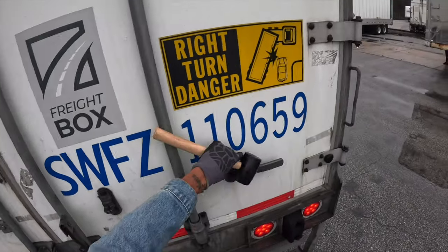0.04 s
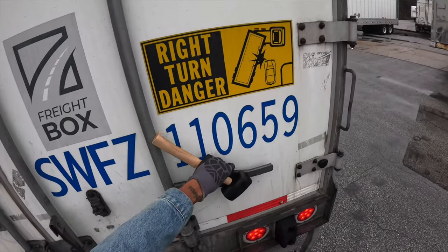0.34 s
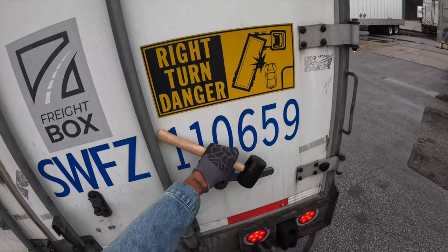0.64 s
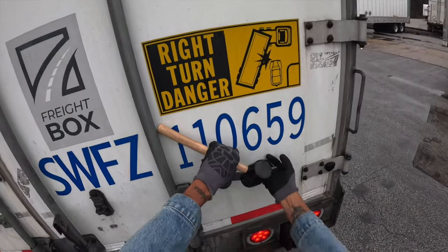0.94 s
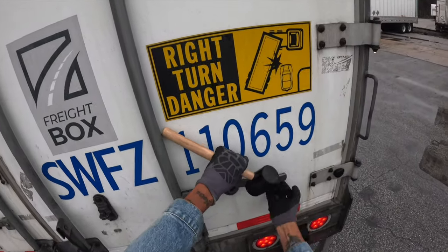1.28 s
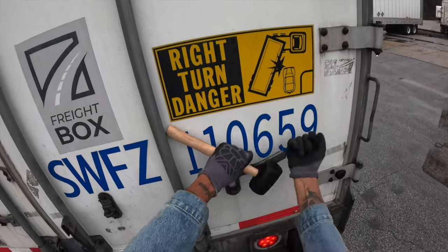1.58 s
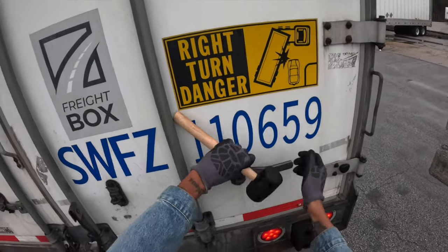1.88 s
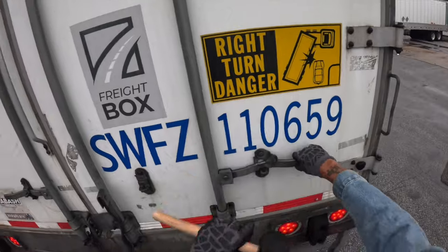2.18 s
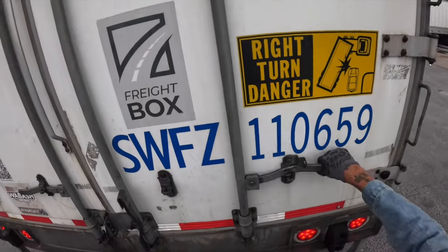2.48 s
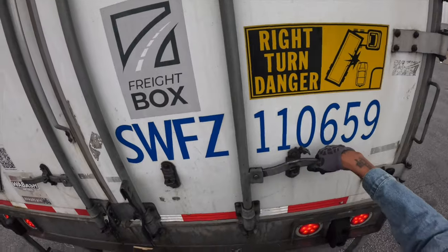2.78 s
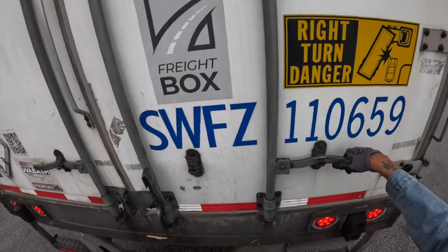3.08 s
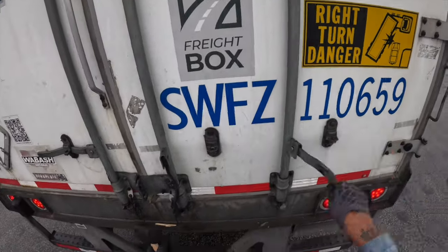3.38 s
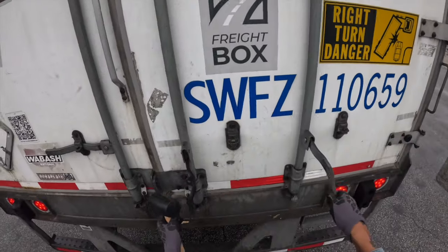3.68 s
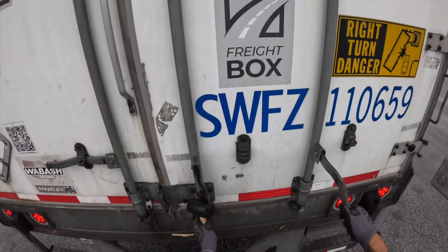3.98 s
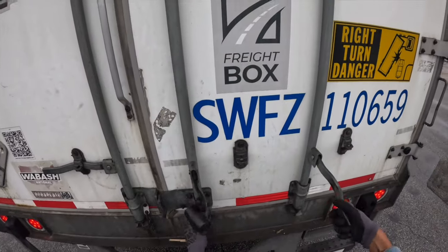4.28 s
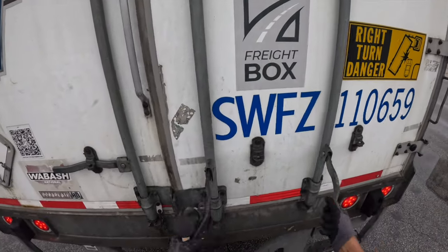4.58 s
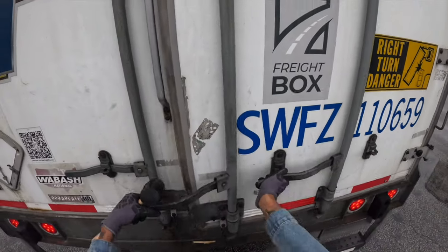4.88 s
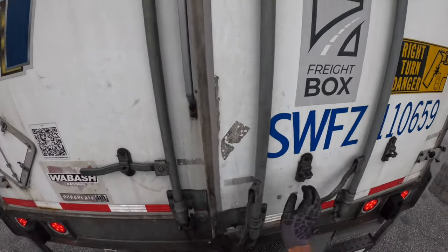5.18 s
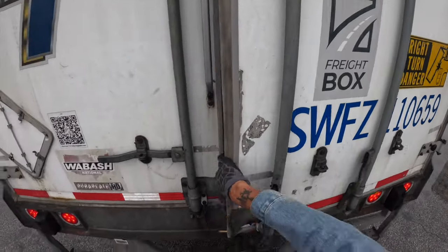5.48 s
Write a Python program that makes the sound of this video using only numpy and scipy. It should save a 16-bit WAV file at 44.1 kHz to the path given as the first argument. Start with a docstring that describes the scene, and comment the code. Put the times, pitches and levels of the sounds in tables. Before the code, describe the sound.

Steel latch handles clank and clink against a hollow trailer door, and locking bars scrape and groan over a low machinery hum.

```python
"""An open yard with a low machinery hum; a semi-trailer's rear door is unlatched at arm's length.
Keepers and handles clank and clink, ringing the locking bars and the hollow door.
A steel handle sings as it is rubbed free. The bars stick and slip as they turn in their guides:
they scrape, tick and groan. The box behind the door adds a dull tail."""
import sys
import numpy as np
from scipy import signal
from scipy.fft import rfft, irfft, next_fast_len
from scipy.io import wavfile
from scipy.ndimage import uniform_filter1d

SR = 44100
rng = np.random.default_rng(int(sys.argv[2]) if len(sys.argv) > 2 else 0)


def pcm_store(signal):
    """Save signal as 16-bit PCM."""
    levels = np.round(np.clip(np.atleast_2d(signal), -1, 1) * 32767)
    wavfile.write(sys.argv[1], SR, levels.astype(np.int16).T)


N = 248724
TIME_S = np.arange(N) / SR


def undb(db):
    """Decibels to gain."""
    return 10 ** (np.asarray(db) / 20)


def unit(x):
    """Scale to rms 1."""
    return x / np.sqrt(np.mean(x ** 2) + 1e-18)


def add(track, start_s, x):
    """Mix x into the track from start_s."""
    i = max(int(start_s * SR), 0)
    track[i:i + len(x)] += x[:max(N - i, 0)]


def fade(t, t60_s):
    """Free decay, 60 dB down after t60_s."""
    return np.exp(-np.log(1000) * t / max(t60_s, 1e-3))


def walk(rate_hz, size):
    """Smooth random curve, spread near 1."""
    at = np.arange(size) * rate_hz / SR
    return np.interp(at, np.arange(4096), rng.standard_normal(4096))


def colour(x, hz, db):
    """Minimum-phase filter through the (hz, db) points."""
    size = 2 * next_fast_len(len(x) // 2 + 1024)
    f = np.maximum(np.arange(size // 2 + 1) * SR / size, 1)
    cepstrum = irfft(np.interp(np.log(f), np.log(hz), db) * np.log(10) / 20)
    cepstrum[1:size // 2] *= 2
    cepstrum[size // 2 + 1:] = 0
    return irfft(rfft(x, size) * np.exp(rfft(cepstrum)))[:len(x)]


def band(x, lo_hz, hi_hz):
    """Causal band-pass, 12 dB/octave each side."""
    size = next_fast_len(len(x) + 2048, True)
    f = np.tan(np.pi * np.clip(np.arange(size // 2 + 1), .5, size / 2 - .5) / size)
    low, high = np.tan(np.pi * np.array([lo_hz, hi_hz]) / SR)
    s = 1j * (f * f - low * high) / (f * (high - low))
    return irfft(rfft(x, size) / (s * s + np.sqrt(2) * s + 1), size)[:len(x)]


# rumble spectrum: f/Hz, relative density/dB
RUMBLE_SPECTRUM = [(25, -33), (55, 4), (100, -3), (170, -1.5), (430, -10), (1000, -12.5), (3000, -26.5),
                   (6000, -41.5), (8200, -52), (9500, -80), (15000, -101.5)]
# hum lines: f/Hz, rms level/dB
HUM_LINES = [(94, -46), (122, -49.5), (140, -49.5), (234, -57), (272, -62)]


def yard(rumble_db=-40, rumble_waver_db=1, hum_waver_db=3):
    """Distant machinery: broad rumble and wavering hum lines."""
    rumble = unit(colour(rng.standard_normal(N), *np.transpose(RUMBLE_SPECTRUM)))
    out = rumble * undb(rumble_db + rumble_waver_db * walk(1.5, N))
    for hz, db in HUM_LINES:
        waver = undb(hum_waver_db * walk(2, N))
        phase = 2 * np.pi * hz * TIME_S + walk(5.1, N)
        out += undb(db) * unit(waver * np.sin(phase))
    return out


def trailer_box(x, wet_db=-17, t60_s=1.0, top_hz=1600):
    """The hollow box behind the door adds a dull tail."""
    tail = signal.sosfilt(signal.butter(1, top_hz, fs=SR, output="sos"), rng.standard_normal(SR))
    tail *= fade(TIME_S[:SR], t60_s) * np.sqrt(2 * np.log(1000) / t60_s / SR)
    return x + undb(wet_db) * signal.fftconvolve(x, tail)[:N]


# steel handle modes: f/Hz, relative level/dB
HANDLE_MODES = [(4988, 11), (5741, -5.5), (6848, -1.5), (8150, -15), (9298, -25), (14974, -24)]
# rubs and taps: t/s, length/s, level/dB, lowest mode offset/dB, t60 of the lower modes/s
HANDLE_RUBS = [(1.968, 0.0073, -48.5, -20, 0.58), (2.09, 0.038, -32.5, -12, 0.099),
               (2.518, 0.086, -53.5, -7, .95), (2.565, 0.11, -49, 1.5, 0.19),
               (2.752, 0.015, -43, -21, 0.44), (2.85, .12, -51.5, -17, .06), (3.03, 0.0072, -43, -17, 0.2)]


def handle(gain_db=2, flutter_db=3, rise_s=0.0064):
    """Rubbing feeds the handle's high modes unevenly; afterwards the top ones die first."""
    out, t = np.zeros(N), TIME_S[:SR // 2]
    knee_hz = HANDLE_MODES[2][0]
    for start_s, length_s, db, lowest_db, t60_s in HANDLE_RUBS:
        rubbed_s = np.minimum(t, length_s)
        for k, (hz, mode_db) in enumerate(HANDLE_MODES):
            decay = fade(t - rubbed_s, t60_s * min(1, knee_hz / hz) ** 2)
            envelope = (1 - np.exp(-t / rise_s)) * decay
            # level and phase wander only during the rub
            grip, slip = (np.interp(rubbed_s, t, walk(120, len(t))) for _ in range(2))
            level = undb(gain_db + db + mode_db + flutter_db * grip + lowest_db * (k == 0))
            add(out, start_s, envelope * level * np.sin(2 * np.pi * hz * t + .5 * slip))
    return out


# stick-slip tones: t/s, length/s, start f/Hz, end f/Hz, rms level/dB
GROAN_GLIDES = [(0.937, 0.044, 2400, 2495, -29.5), (2.878, 0.04, 215, 222, -26),
                (3.332, 0.036, 636, 650, -24), (3.345, 0.058, 178, 220, -18),
                (3.356, 0.047, 1291, 1390, -22.5), (3.382, 0.069, 1493, 1495, -19.5),
                (3.461, 0.064, 236, 232, -17.5), (4.589, 0.024, 150, 152, -15.5),
                (4.624, 0.073, 450, 430, -29.5), (4.677, 0.076, 186.7, 320, -15),
                (4.765, 0.087, 193, 154, -21.5), (5.131, 0.06, 1220, 1030, -26)]


def groans(waver=0.0057, rough_db=3.5, octave_db=-24):
    """Slipping locks onto one resonance: a short, unsteady tone."""
    out = np.zeros(N)
    for start_s, length_s, start_hz, end_hz, db in GROAN_GLIDES:
        size = int(length_s * SR)
        hz = np.linspace(start_hz, end_hz, size) * (1 + waver * walk(400, size))
        phase = 2 * np.pi * np.cumsum(hz) / SR
        tone = np.sin(phase) + undb(octave_db) * np.sin(2 * phase)
        envelope = undb(rough_db * walk(300, size)) * signal.windows.tukey(size, 0.68)
        add(out, start_s, undb(db) * unit(tone * envelope))
    return out


def steel_part(x, hz, peak_db=5, width_hz=130, ripple_db=4):
    """One main resonance among many random lesser ones; energy is preserved."""
    f = np.geomspace(40, SR / 2, 700)
    heights = np.clip(rng.standard_normal(130), -1.5, 1.5)
    lesser_db = ripple_db * np.interp(np.sqrt(f), np.linspace(0, 150, 130), heights)
    db = lesser_db * np.minimum(f / 1000, 1) + peak_db / (1 + ((f - hz) / width_hz) ** 2)
    trend_db = 10 * np.log10(uniform_filter1d(undb(db) ** 2, 150))
    return unit(colour(x, f, db - trend_db)) * np.sqrt(np.mean(x ** 2))


def ring(modes, t):
    """Decaying modes, weighted at random for each strike spot."""
    weights = rng.choice([-1, 1], len(modes)) * (.5 + rng.random(len(modes)))
    return sum(weight * undb(db) * np.sin(2 * np.pi * hz * t) * fade(t, t60_s)
               for (hz, db, t60_s), weight in zip(modes, weights))


# locking bar modes: f/Hz, relative level/dB, t60/s
BAR_MODES = [(285, -20, 0.94), (456, -16, 0.28), (690, -20.5, 0.81), (960, -9, 0.19), (1257, -33, 0.19),
             (2092, -7.5, 0.14)]
# hollow door modes: f/Hz, relative level/dB, t60/s
DOOR_MODES = [(93, -14.5, .3), (129.7, -1, 0.24), (167, -15.5, 0.41)]
# thud, panel, clank and treble bands: low f/Hz, high f/Hz
BANDS_HZ = np.array([(60, 300), (300, 900), (900, 3000), (3000, 8000)])


def strike(db, treble_db, t60_s, hz, thud_db=-13, panel_db=-12,
           attack_s=0.0003, crack_db=-9, bar_db=0, size=8000):
    """One contact: a crack, the part's short ring, the longer modes of bar and door."""
    t, hit = TIME_S[:size], np.zeros(size)
    chatter = undb(3 * walk(500, size))  # loose parts touch again as they shake
    chatter *= 1 - np.exp(-t / attack_s)
    edges_hz = (20, 300, 900, 3000, 17000)
    decays_s = (max(2.7 * t60_s, .12), 1.97 * t60_s, t60_s, t60_s)  # the heavy door rings longest
    for lo, hi, decay_s in zip(edges_hz, edges_hz[1:], decays_s):
        burst = band(rng.standard_normal(size), lo, hi) * chatter * fade(t, decay_s)
        hit += unit(burst) * np.sqrt(2 * (hi - lo) / SR / size)
    crack = band(signal.unit_impulse(size), edges_hz[1], edges_hz[-1])
    dead_stop = 1.5 * np.exp(-(t60_s / .016) ** 4)  # steel that stops dead cracks harder
    hit += crack * (undb(crack_db) + dead_stop)
    hit = steel_part(hit, hz) * SR * np.sqrt(.03 / 2)  # band levels: energy spread over 30 ms

    lows_hz, highs_hz = np.transpose(BANDS_HZ)
    centres_hz = np.sqrt(lows_hz * highs_hz)
    density_db = np.array([thud_db, panel_db, 0, treble_db]) - 10 * np.log10(highs_hz - lows_hz)
    heave_db = min(0.75 * (thud_db - 12.5), 0)  # only a blunt blow moves the whole door
    sub_db = density_db[0] + 2 * heave_db
    hit = colour(hit, np.r_[centres_hz[0] / 2, centres_hz], np.r_[sub_db, density_db])

    ping = undb(-2) * np.sin(2 * np.pi * hz * t) * fade(t, min(2 * t60_s, .09))
    bar = undb(bar_db) * ring(BAR_MODES, t)
    door = undb(thud_db + heave_db - 1) * ring(DOOR_MODES, t)
    return undb(db) * (hit + ping + bar + door)


def effort_db(t, rise_s, hold_s, fall_s, grip_s=0.015, coast_s=0.04, swell_db=8.5):
    """The arm leans on a bar: grip, rise, hold, fall, coast to rest."""
    corners_s = np.cumsum([-grip_s, grip_s, rise_s, hold_s, fall_s, coast_s])
    return np.interp(t, corners_s, [-90, -swell_db, 0, 0, -swell_db, -90])


# bar turns: t/s, rise/s, hold/s, fall/s, level/dB, thud offset/dB, panel offset/dB, treble offset/dB
BAR_TURNS = [(3.329, .015, .11, 0.031, -25, 1, -2, -44), (4.39, 0.014, 0.28, 0.046, -43, 7, 6, -34),
             (4.58, 0.059, 0.2, 0.098, -36.5, 10.5, 9, -6),
             (5.087, 0.078, 0.044, 0.14, -29.5, 6.5, 4.5, -51)]


def scrapes(slips_per_s=1400, spread_db=2, bar_db=-11, door_lag_s=0.039, low_hz=150, top_hz=4600):
    """Dry steel slips in its guides in tiny jerks; the bar sings along and the door follows late."""
    out, size = np.zeros(N), 36000
    t, bar_hz = TIME_S[:size], BAR_MODES[5][0]
    for start_s, rise_s, hold_s, fall_s, db, thud_db, panel_db, treble_db in BAR_TURNS:
        slips = (rng.random(size) < slips_per_s / SR) * undb(spread_db * rng.standard_normal(size))
        slip_power = signal.fftconvolve(slips ** 2, fade(t[:512], .008))[:size]
        grit = np.sqrt(abs(slip_power)) * rng.standard_normal(size)
        grit = steel_part(grit, bar_hz, peak_db=-1, ripple_db=6.5)
        uneven_db = db - 0.5 * walk(30, size)
        steel = undb(uneven_db + effort_db(t, rise_s, hold_s, fall_s))
        door = undb(uneven_db + effort_db(t - door_lag_s, rise_s, hold_s, fall_s))
        levels = (door * undb(thud_db), door * undb(panel_db), steel, steel * undb(treble_db))
        for (lo, hi), level in zip(BANDS_HZ, levels):
            rasp = band(grit, max(lo, low_hz), min(hi, top_hz))
            add(out, start_s, level * unit(band(rasp, lo / 2, hi)))
        singing = unit(band(slips, bar_hz - 20, bar_hz + 20))
        add(out, start_s, steel * undb(bar_db) * singing)
    return out


def catches(ticks_per_s=18, gain_db=1.5, spread_db=7, count=24):
    """A turning bar ticks at uneven moments, louder the harder it is pushed."""
    out = np.zeros(N)
    for start_s, rise_s, hold_s, fall_s, db, *_ in BAR_TURNS:
        tick = strike(db + gain_db, treble_db=-10, t60_s=.035, hz=1700)
        tick = band(tick, 240, 5300)  # muffled by the guide
        times_s = (np.arange(count) + rng.random(count)) / ticks_per_s
        levels_db = effort_db(times_s, rise_s, hold_s, fall_s) - spread_db * rng.standard_normal(count)
        for at_s, level_db in zip(times_s[times_s < rise_s + hold_s + fall_s], levels_db):
            add(out, start_s + at_s, tick * undb(level_db))
    return out


# handle in its keeper: t/s, level/dB, treble offset/dB, resonance f/Hz
KEEPER_CLINKS = [(0.4638, -32, 5, 2310), (0.498, -28.5, 0, 2360), (0.59, -36, -4.5, 2310),
                 (1.161, -32.5, -2.5, 2020), (1.2256, -35, 3.5, 3520), (1.967, -42.5, 7, 3400),
                 (2.089, -27.5, 3.5, 1694), (2.126, -27, -10, 3370), (2.1471, -35, 10, 3220),
                 (2.1948, -38, 1, 3920), (2.557, -33, 11, 4600), (2.6578, -41, 7, 4930),
                 (2.726, -42, 2, 1800), (2.752, -32, 6.5, 3570), (2.8261, -30.5, 2, 1696),
                 (2.9318, -33.5, 4, 1900), (3.0138, -37.5, -2, 1800), (3.0231, -32.5, 14, 2250),
                 (3.117, -36.5, 2.5, 1800), (3.1285, -31.5, 6, 1970)]


def clinks(t60_s=0.052, bounce_s=.0085, bounce_db=-8):
    """The loose handle hits its keeper and bounces once, hardly moving the door."""
    out = np.zeros(N)
    for start_s, db, treble_db, hz in KEEPER_CLINKS:
        hit = strike(db, treble_db, t60_s, hz, attack_s=0.0005, crack_db=-15, bar_db=-4)
        add(out, start_s, hit)
        add(out, start_s + bounce_s * rng.uniform(0.4, 1.2), undb(bounce_db) * hit)
    return out


# steel on the door: t/s, level/dB, thud offset/dB, treble offset/dB, clank t60/s, resonance f/Hz
DOOR_KNOCKS = [(0.115, -33.5, 19.5, -9.5, 0.059, 774), (0.2234, -31.5, 11.5, -16.5, 0.046, 1900),
               (0.5717, -26.5, -0.5, -12, 0.045, 2140), (0.6389, -27.5, 7, -19.5, 0.068, 2206),
               (0.744, -40.5, 13.5, -11, 0.08, 1590), (1.0006, -49, 18, -2, 0.072, 1980),
               (1.5271, -33.5, 23.5, -0.5, 0.19, 2680), (1.5622, -22.5, 2.5, 3.5, 0.022, 3850),
               (1.574, -22, 0, -7.5, 0.058, 1027), (1.6066, -38, 21.5, 10, 0.025, 2250),
               (1.6589, -25, 3, -14.5, .056, 1536), (1.752, -33.5, -0.5, -11.5, 0.22, 1030),
               (1.8021, -33, 15.5, -5, 0.015, 1230), (1.805, -23, 7.5, 2, 0.073, 1200),
               (1.8401, -32, 12, -3.5, .11, 2010), (2.2717, -41.5, 23, -2.5, 0.049, 1920),
               (2.4901, -29, 4, -3, .15, 837), (2.5892, -24, 9.5, -5, 0.13, 960),
               (2.8879, -34.5, 1.5, 1, 0.31, 2120), (3.297, -29, 2.5, -24.5, 0.41, 870),
               (3.3386, -20.5, -8.5, -10, 0.54, 1337), (3.5945, -35.5, -21, -3, 0.066, 2330),
               (3.852, -26, 3.5, -9.5, 0.058, 1670), (3.999, -23, 4.5, -6.5, 0.097, 1680),
               (4.2048, -26, -1.5, -8.5, 0.11, 1535), (4.3758, -32, 8.5, -1, 0.098, 3340),
               (4.474, -41, -1.5, -4, 0.044, 3130), (4.682, -30.5, 19, -9, 0.31, 1930),
               (4.7526, -23, 6.5, -6, 0.14, 2140), (4.829, -26, -1.5, -37.5, 0.1, 873),
               (4.9003, -34, 5.5, 1.5, 0.084, 2090), (5.3514, -21.5, -5, -3.5, 0.017, 2010),
               (5.3567, -29.5, 7.5, 3.5, 0.12, 2080), (5.492, -33.5, 0, -7.5, 0.36, 1146)]


def knocks(settle_db=-25, settle_s=(.054, .13)):
    """Steel lands on the door and shakes it; the loose part drops back with a tick."""
    out = np.zeros(N)
    for start_s, db, thud_db, treble_db, t60_s, hz in DOOR_KNOCKS:
        panel_db = -4 + 0.31 * thud_db  # the door skin follows the thud
        hit = strike(db, treble_db, t60_s, hz, thud_db, panel_db, size=12000)
        add(out, start_s, hit)
        add(out, start_s + rng.uniform(*settle_s), undb(settle_db) * band(hit, 1600, 8000))
    return out


# overall tone of knocks, clinks, scrapes and catches at the microphone: f/Hz, gain/dB
HEARD_TONE = [(25, -27), (55, -5.5), (110, -0.5), (330, 2), (1100, 2.5), (2000, 2.5), (4000, 1.5),
              (6500, -12.5), (8300, -25), (9200, -44), (14500, -46)]


def heard_tone(x):
    """As the microphone hears it: full middle, steep treble drop above 8 kHz."""
    return colour(x, *np.transpose(HEARD_TONE))


def scene():
    """All sources straight ahead, the same in both ears."""
    direct = handle() + yard()
    tones = groans()
    door = heard_tone(knocks() + clinks() + scrapes() + catches())
    mono = trailer_box(door + tones) + direct
    return np.array([mono, mono])


def record(dry, top_hz=15800):
    """Clip at full scale, then cut the top."""
    lowpass = signal.ellip(8, .2, 70, top_hz, fs=SR, output="sos")
    return signal.sosfilt(lowpass, np.clip(dry, -1, 1))


dry = scene()
out = record(dry)
pcm_store(out)
```